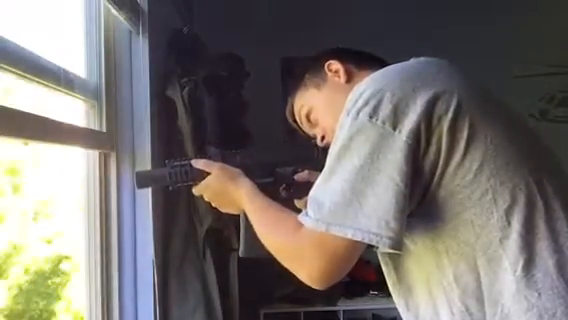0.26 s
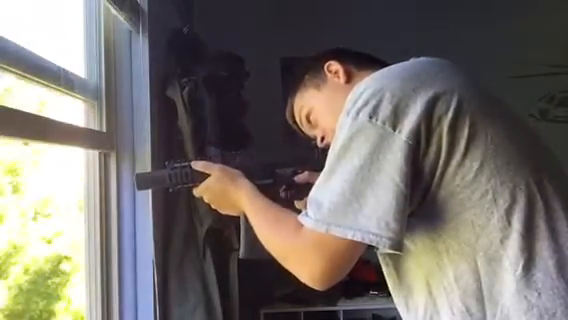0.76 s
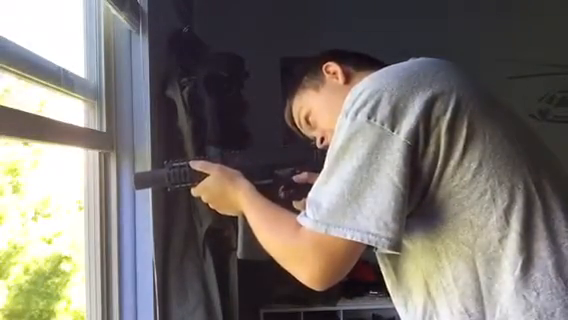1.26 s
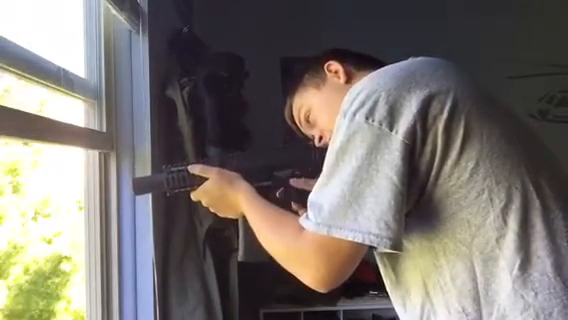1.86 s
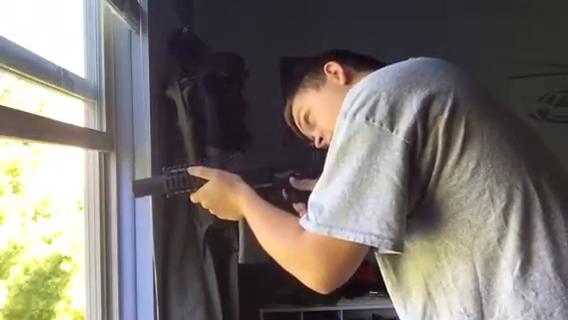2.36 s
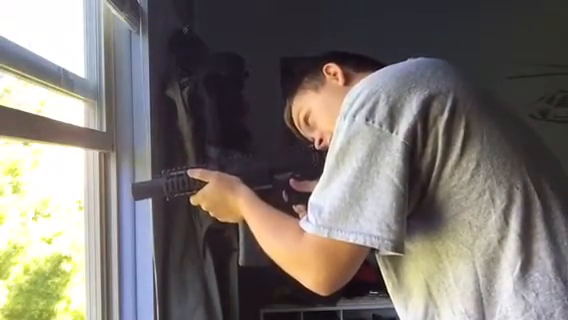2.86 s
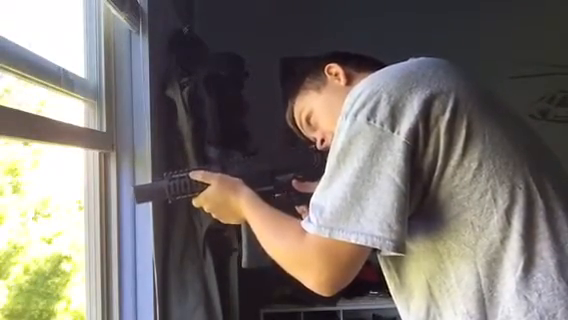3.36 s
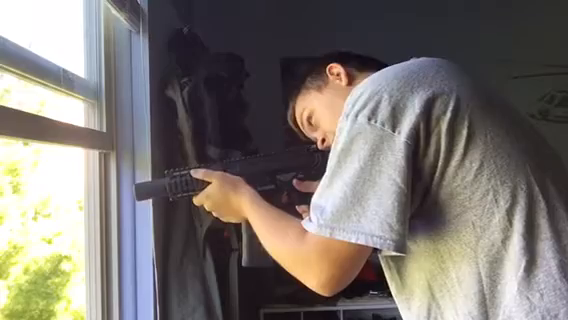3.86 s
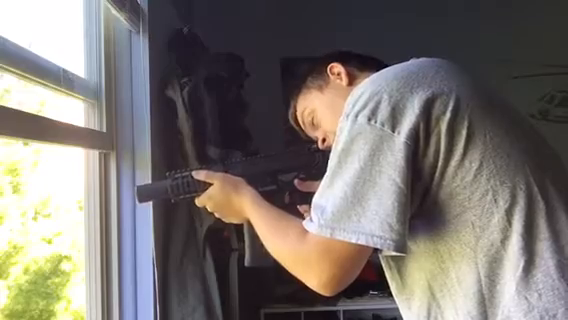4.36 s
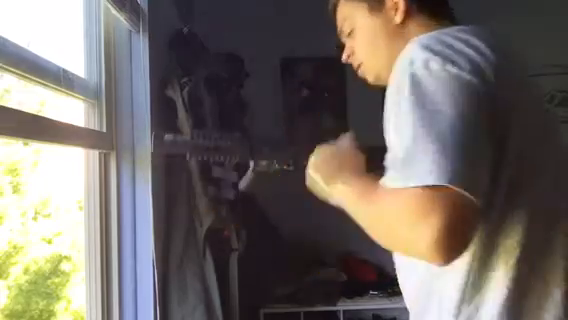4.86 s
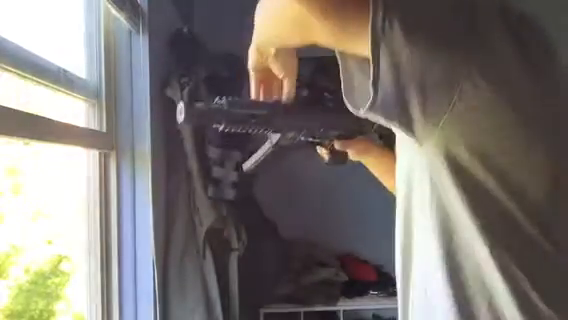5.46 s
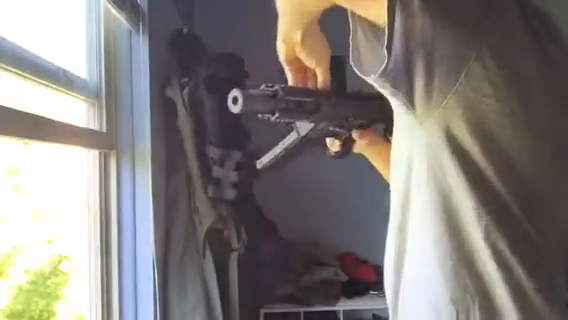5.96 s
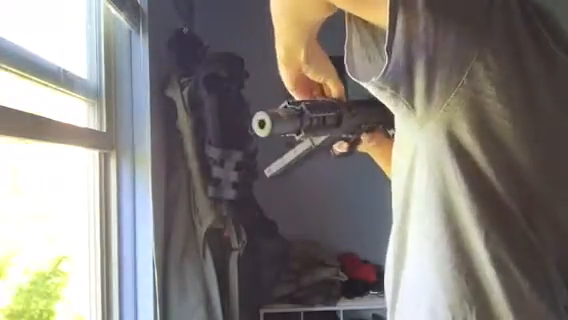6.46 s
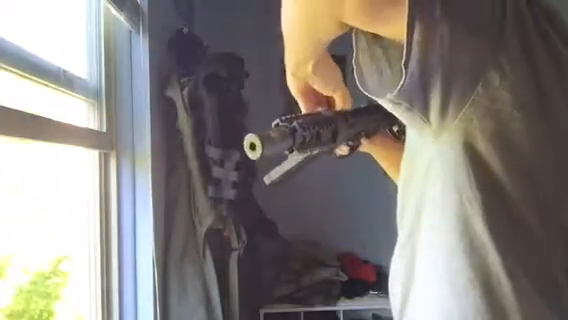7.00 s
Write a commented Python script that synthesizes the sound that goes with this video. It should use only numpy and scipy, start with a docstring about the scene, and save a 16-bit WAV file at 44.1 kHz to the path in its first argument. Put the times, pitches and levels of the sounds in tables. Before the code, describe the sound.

The tail of one shot opens the scene, followed by six dry, punchy semi-automatic airsoft shots, unevenly spaced, each with a tiny motor zip and springy metallic ring. After a pause a switch clicks crisply, and a rapid chattering burst follows, its motor coasting down. Then it is quiet: sparse light ticks of loose rifle parts, faint hum and room noise, heard close with short indoor reverberation.

```python
"""A small room: an electric airsoft rifle fires single shots, its selector snaps over and a burst follows.
For each shot the motor winds up rasping gears and the piston slams home: a cluster of knocks, coloured
as a crack, rings the modes of gearbox and stock. Coloured clicks mark the handling, mostly after the burst.
Beneath lie a wavering low hum and faint hiss, made of a drifting sine and filtered noise."""
import sys
import numpy as np
from scipy import signal
from scipy.fft import rfft, irfft
from scipy.io import wavfile
from scipy.ndimage import uniform_filter1d, minimum_filter1d

SR = 44100
rng = np.random.default_rng(int(sys.argv[2]) if len(sys.argv) > 2 else 0)


def master_out(mix):
    """Clip the mix to full scale and print it as 16-bit PCM to the path in sys.argv[1]."""
    frames = np.transpose(np.atleast_2d(mix))
    ceiling = np.clip(frames, -1, 1)
    pcm = np.round(ceiling * 32767).astype(np.int16)
    wavfile.write(sys.argv[1], SR, pcm)


N = 318962
LEAD = SR // 4  # samples computed ahead of time 0
T = np.arange(-LEAD, N) / SR
SHORT = np.arange(SR // 2) / SR  # time axis of one hit, s

# Single shots. Each row: piston landing in seconds, wind-up before it in seconds, gear level in dB,
# start-up growl in dB, force in dB, thump (ringing relative to force) in dB.
SINGLE_SHOTS = [(-.11, 0.035, -1, -6, -0.5, 13.5), (.124, 0.052, 2, -2.5, 2.5, 5.5),
                (0.7881, 0.059, 3, -2, 2, 6.5), (0.9955, .048, 0, -6.5, 4, 2.5),
                (1.1697, 0.055, -1, -3, 3.5, 5), (1.3265, 0.051, -1, -5, 2.5, 4.5),
                (1.4952, 0.055, -1, -5, 2, 5.5)]
# Knocks within one blow, as the piston lands and rebounds. Each row: delay in seconds, relative level in dB.
PISTON_KNOCKS = [(0, -0.5), (.0015, 3), (.0038, -6), (.0055, 2.5)]
# Modes of the rifle. Each row: frequency in Hz, relative level in dB, T60 in seconds.
RIFLE_MODES = [(141.6, -0.5, 0.05), (185, -4, 0.033), (271.7, 2.5, .085), (395, 0.5, 0.057),
               (619.6, -5.5, 0.18), (817, -9.5, 0.032), (974, -5.5, 0.092), (1200, -7.5, 0.18),
               (1459, -6.5, 0.082), (1650, -6.5, .08), (1862, -8.5, 0.27), (2145, 0.5, 0.072),
               (2862, -7.5, .1), (4480, -1, 0.074), (5600, -6.5, 0.055)]
# Modes of the nozzle plate. Each row: frequency in Hz, relative level in dB, T60 in seconds.
NOZZLE_PLATE_MODES = [(1510, -5.5, 0.18), (1858, 1, .12), (2830, 1, .11), (3250, -2.5, 0.085)]
# Spectrum of the piston's crack. Each row: frequency in Hz, relative level in dB.
CRACK_SPECTRUM = [(40, -25.5), (100, -6), (240, 1.5), (500, -2), (1000, -1), (2200, -1.5), (3400, -6),
                  (4600, -4), (6100, -4), (7500, -16), (10000, -22.5), (16000, -24)]
# Burst cycles in which the piston lands softly: cycle numbers, counted from 0.
SOFT_BURST_CYCLES = (3, 6, 8, 12, 16, 19)
# Spectrum of the gear rasp. Each row: frequency in Hz, relative level in dB.
GEAR_SPECTRUM = [(100, -29), (350, -22), (650, -4.5), (1200, 0.5), (2300, -4.5), (3000, 2.5), (3700, -0.5),
                 (4300, 1.5), (5000, -8.5), (5800, 1), (7200, -7), (10000, -12.5), (16000, -22)]
# Spectrum of the selector. Each row: frequency in Hz, relative level in dB.
SELECTOR_SPECTRUM = [(200, -40.5), (700, -30.5), (1100, -14.5), (2400, -11.5), (2800, -2), (4300, -2),
                     (5900, -1.5), (7400, -1.5), (8000, -7), (10500, -16.5), (16000, -19.5)]
# Handling clicks. Each row: start in seconds, relative level in dB, centre of the colour in Hz,
# fall away from it in dB per octave squared, room tail in dB.
HANDLING_CLICKS = [(.682, -29, 5900, 2.5, 3), (2.287, -34.5, 4960, -1.5, -3), (3.921, -21.5, 4640, 24, 6),
                   (4.647, -34, 6960, 1, 1), (4.72, -32.5, 8050, 2, -4), (4.857, -23.5, 2184, 4.5, 2),
                   (5.313, -22, 2204, 2.5, -4), (5.336, -30, 2490, -1.5, -1), (5.356, -25, 2520, -1, -7),
                   (5.7268, -9, 4280, 3.5, -10), (6.181, -27, 1508, 8.5, -9), (6.619, -35.5, 2526, 0.5, -8),
                   (6.638, -35, 2000, 7, -15), (6.901, -23.5, 2600, 8.5, -13)]
# Spectrum common to the handling clicks. Each row: frequency in Hz, relative level in dB.
CLICK_SPECTRUM = [(300, -27), (900, -14), (1250, -2.5), (2500, -6.5), (2900, 0), (3700, -5), (4300, -1),
                  (5200, -11), (6200, -3), (7200, -18.5), (8400, -10), (10000, -24.5), (16000, -26)]
# Wavering of the hum. Each row: time in seconds, relative level in dB.
HUM_LEVELS = [(1.85, -59.5), (2.122, -54), (2.186, -62), (2.38, -57), (3.6, -65), (3.69, -60.5),
              (4.44, -59), (4.71, -75), (5.0, -63), (5.06, -75.5), (5.2, -60), (6.58, -56.5), (6.68, -64.5),
              (7.07, -60), (7.1, -76), (7.2, -57.5)]
# Spectrum of the room's steady noise. Each row: frequency in Hz, relative level in dB.
HISS_SPECTRUM = [(40, -7), (120, 1.5), (380, -3.5), (650, -8.5), (1000, -7.5), (1600, -10.5), (2500, -18.5),
                 (4200, -21), (6500, -26.5), (8800, -23.5), (10000, -32.5), (16000, -37.5)]
# Reverberation of the room. Each row: frequency in Hz, T60 in seconds.
REVERB_T60 = [(100, .26), (300, .27), (600, .28), (1100, .39), (1650, .48), (2600, .35), (6000, .32),
              (10000, .27), (16000, .22)]
# Wall echoes. Each row: delay in seconds, relative level in dB.
WALL_ECHOES = [(.0077, -15), (.0103, -16), (.0127, -17), (.0181, -9), (.0194, -11), (.0213, -11),
               (.0262, -12)]

SCATTER_GAIN = .55  # chance rattle in each piston blow
RETURN_S, RETURN_DB, RETURN_RING_DB = .0185, -7, -25.5  # nozzle clack: delay; crack and ring re blow force
STANDING_HZ, STANDING_T60_S = 286, .48  # standing wave of the room
BURST_ON_S, BURST_OFF_S = 2.41, 3.226  # trigger held
CYCLES_PER_S = 30.26  # piston cycles at full motor speed
SPIN_UP_S, COAST_S = .0613, .16  # time constant of spin-up; time for friction to stop the motor
PRECOCKED_CYCLES = .404  # spring already drawn by this share of a cycle as the burst starts
BURST_GEAR_DB, BURST_GROWL_DB = 3, -3
BURST_FORCE_DB, FORCE_FADE_DB_PER_S = 0.5, 3.5
BURST_THUMP_DB, THUMP_FADE_DB_PER_S = 7, 5
SOFT_DB = -8.5  # added to the force of a soft landing


def piston(crack_db=-2, ring_db=-21, standing_db=-42, rush_db=-5, rush_s=.0025):
    """Blows share one knock cluster and ring the same modes; air rushes out before, the nozzle may clack after."""
    knocks = sum(amp(db) * delayed(snap(rattle=1.33, fade_s=.002), s) for s, db in PISTON_KNOCKS)
    knocks = in_room(knocks, tail_db=-1, walls_db=-5)
    # neighbouring modes swing in opposite directions
    rifle_ring = sum((-1) ** k * amp(db) * mode(hz, t60_s) for k, (hz, db, t60_s) in enumerate(RIFLE_MODES))
    ring = amp(ring_db) * rifle_ring + amp(standing_db) * mode(STANDING_HZ, STANDING_T60_S)
    ring *= 1 - np.exp(-SHORT / .0029)  # the stock takes a moment to swing
    nozzle_ring = amp(RETURN_RING_DB) * sum(amp(db) * mode(hz, t60_s) for hz, db, t60_s in NOZZLE_PLATE_MODES)
    rush_samples = SR // 50
    cracks, rings = np.zeros((2, len(T)))
    for s, force_db, thump_db in blows():
        loose_parts = in_room(snap(rattle=1.9, fade_s=.0035), tail_db=-1, walls_db=-9)
        rush = snap(rattle=3.1, fade_s=rush_s)[:rush_samples][::-1]  # reversed: swells into the blow
        add(cracks, s - rush_samples / SR, amp(force_db + rush_db) * rush)
        add(cracks, s, amp(force_db) * (knocks + SCATTER_GAIN * loose_parts))
        add(rings, s, amp(force_db + thump_db) * ring)
        if s < BURST_ON_S:  # single shots only: the nozzle springs back
            add(cracks, s + RETURN_S, amp(force_db + RETURN_DB) * snap(rattle=4.4, fade_s=.009))
            add(rings, s + RETURN_S, amp(force_db) * nozzle_ring)
    return amp(crack_db) * colour(cracks, CRACK_SPECTRUM) + rings


def blows():
    """Rows (s, force dB, thump dB): one per single shot, one per piston cycle that the motor completes in the burst."""
    rows = [(s, force_db, thump_db) for s, _, _, _, force_db, thump_db in SINGLE_SHOTS]
    cycles = PRECOCKED_CYCLES + CYCLES_PER_S * np.cumsum(motor_speed(BURST_ON_S, BURST_OFF_S)) / SR
    landings_s = T[np.flatnonzero(np.diff(np.floor(cycles)))]
    for k, s in enumerate(landings_s):
        held_s = s - BURST_ON_S
        force_db = BURST_FORCE_DB - FORCE_FADE_DB_PER_S * held_s + SOFT_DB * (k in SOFT_BURST_CYCLES)
        rows.append((s, force_db, BURST_THUMP_DB - THUMP_FADE_DB_PER_S * held_s))
    return rows


def gearbox(mesh_hz=2850, strain_db=13, strain_s=.15, release_s=.04, whine_db=-2, overtone_db=-9,
            growl_db=-22, gears_db=-26):
    """Starting current makes the motor growl; teeth rasp and whine, strained at spin-up, then coast down."""
    speed, drive, current = np.zeros((3, len(T)))
    for on_s, off_s, gear_db, start_db in pulls():
        since_on, since_off = np.maximum(T - on_s, 0), np.maximum(T - off_s, 0)
        turning = motor_speed(on_s, off_s)
        speed = np.maximum(speed, turning)
        strain = amp(gear_db + strain_db * np.exp(-since_on / strain_s))
        drive += strain * turning ** 1.2 * np.exp(-since_off / release_s)
        surge = np.minimum(since_on / .015, 1) * np.exp(-since_on / .13 - since_off / .024)
        current += amp(start_db) * surge

    load = np.sin(2 * np.pi * CYCLES_PER_S * np.cumsum(speed) / SR)  # the spring drags once a cycle
    tooth_hz = mesh_hz * speed * (1 + .009 * load + .012 * band(0, 120))
    teeth = 2 * np.pi * np.cumsum(tooth_hz) / SR
    roughness = np.exp(.069 * np.cos(teeth) + .13 * band(0, 900))
    rasp = colour(unit(rng.standard_normal(len(T)) * roughness), GEAR_SPECTRUM)

    backlash = 1 + .6 * band(0, 260)
    tones = amp(whine_db) * speed ** 5 * np.sin(teeth) + amp(overtone_db) * np.sin(2 * teeth)
    level = drive * amp(gears_db)
    whine = level * backlash * tones
    noise = level * rasp + amp(growl_db) * current * band(hz=1176, width_hz=300)
    direct = amp(-1) * (noise + whine)
    reverberant = amp(-4) * through(noise + amp(-9.5) * whine, room_tail())
    return direct + reverberant


def pulls():
    """Rows (motor on s, motor off s, gear dB, growl dB); in a single shot the blow cuts the motor off."""
    singles = [(s - wind_s, s, gear_db, growl_db) for s, wind_s, gear_db, growl_db, _, _ in SINGLE_SHOTS]
    return singles + [(BURST_ON_S, BURST_OFF_S, BURST_GEAR_DB, BURST_GROWL_DB)]


def motor_speed(on_s, off_s):
    """Share of full speed: exponential spin-up while powered, then friction brakes evenly."""
    spin_up = 1 - np.exp(-np.clip(T - on_s, 0, off_s - on_s) / SPIN_UP_S)
    return spin_up * np.clip(1 - (T - off_s) / COAST_S, 0, 1)


def selector(slide_db=-27, snap_db=-5, ring_db=-17):
    """The fire selector slides, then snaps into its detent and rings briefly."""
    out = np.zeros(len(T))
    ring = amp(ring_db) * (mode(2812, .016) + .9 * mode(5950, .04) + .63 * mode(3232, .035))
    detent = in_room(snap(rattle=3.83, fade_s=.0038), tail_db=-7.5, walls_db=-3)
    add(out, 1.843, amp(slide_db) * snap(rattle=5.9, fade_s=.012))
    add(out, 1.8547, amp(snap_db) * (detent + ring))
    return colour(out, SELECTOR_SPECTRUM)


def handling(level_db=-13, ring_db=-24):
    """Loose parts click as the rifle is moved, each with its own colour and a brief metal ring."""
    out = np.zeros(len(T))
    ring = amp(ring_db) * (.34 * mode(2880, .09) + .38 * mode(1270, .079) + .29 * mode(4200, .06))
    for s, db, centre_hz, fall_db, room_db in HANDLING_CLICKS:
        spectrum = [(hz, level - fall_db * np.log2(hz / centre_hz) ** 2) for hz, level in CLICK_SPECTRUM]
        click = in_room(snap(rattle=1.1, fade_s=.0039), room_db, walls_db=-9) + ring
        add(out, s, amp(db + level_db) * colour(click, spectrum))
    return out


def background(hiss_db=-66, sizzle_db=-86):
    """A wavering low hum (drifting sine and two noise bands), room noise and a thin band of hiss."""
    turns = np.cumsum(55.6 + 1.7 * band(0, 10)) / SR
    swell = amp(np.interp(T, *np.transpose(HUM_LEVELS)))
    hum = swell * (1.7 * np.sin(2 * np.pi * turns) + .21 * band(58, 40) + .39 * band(87, 25))
    room_noise = amp(hiss_db) * colour(rng.standard_normal(len(T)), HISS_SPECTRUM)
    return hum + room_noise + amp(sizzle_db) * band(7850, 980)


def in_room(hit, tail_db, walls_db):
    """A hit, its echoes off the walls and the diffuse tail that it leaves."""
    echoes = sum(amp(db) * delayed(hit, s) for s, db in WALL_ECHOES)
    return hit + amp(walls_db) * echoes + amp(tail_db) * np.linalg.norm(hit) * room_tail()


def room_tail(build_s=.0047, linger_db=-19):
    """Diffuse reverberation of unit energy: each band has its own decay; a faint part lasts twice as long."""
    hz, t, noise = signal.stft(rng.standard_normal(len(SHORT)), SR, nperseg=256)
    decay = amp(-60 * t / read(REVERB_T60, hz)[:, None])
    lingering = amp(linger_db) * np.sqrt(decay)
    tail = signal.istft(noise * (decay + lingering), SR, nperseg=256)[1][:len(SHORT)]
    tail *= 1 - np.exp(-(SHORT / build_s) ** 2)
    return tail / np.linalg.norm(tail)


def snap(rattle, fade_s):
    """A sharp contact (one impulse) and the dying noise chatter that follows it."""
    chatter = rng.standard_normal(len(SHORT)) * np.exp(-SHORT / fade_s)
    return (SHORT == 0) + rattle * chatter / np.linalg.norm(chatter)


def mode(hz, t60_s):
    """One dying resonance: a sine that loses 60 dB in t60_s."""
    return np.exp(-np.log(1000) * SHORT / t60_s) * np.sin(2 * np.pi * hz * SHORT)


def band(hz, width_hz):
    """Noise of rms 1 in one resonance with steep skirts."""
    f = np.fft.rfftfreq(len(T), 1 / SR)
    resonance = 1 / (1 + (2 * (f - hz) / width_hz) ** 2)
    return unit(irfft(rfft(rng.standard_normal(len(T))) * resonance, len(T)))


def colour(x, spectrum, size=4096):
    """Causal (minimum-phase) filter of unit energy with the given spectrum."""
    log_gain = np.log(amp(read(spectrum, abs(np.fft.fftfreq(size, 1 / SR)))))
    response = np.fft.ifft(np.exp(np.conj(signal.hilbert(log_gain)))).real[:size // 2]
    return through(x, response / np.linalg.norm(response))


def through(x, response):
    """Convolves and keeps the length."""
    return signal.fftconvolve(x, response)[:len(x)]


def read(points, hz):
    """Reads a table along log frequency."""
    f, value = np.transpose(points)
    return np.interp(np.log(hz + 1), np.log(f + 1), value)


def delayed(x, s):
    """Shifts a hit later by s seconds, within its own length."""
    return np.roll(x, round(s * SR))


def add(mix, s, sound):
    """Mixes a sound in at time s."""
    part = mix[max(LEAD + round(s * SR), 0):][:len(sound)]
    part += sound[:len(part)]


def amp(db):
    """Decibels to gain."""
    return 10 ** (np.asarray(db) / 20)


def unit(x):
    """Scales to rms 1."""
    return x / np.sqrt(np.mean(x ** 2) + 1e-20)


def scene():
    """The rifle's parts over the sound of the room, from time 0 on."""
    return (piston() + gearbox() + selector() + handling() + background())[None, LEAD:]


def record(dry, threshold=.71, release_nepers_per_s=600, edge_hz=15900):
    """A very fast limiter holds the peaks down; a low-pass then limits the band."""
    over = np.log(np.maximum(abs(dry[0]) / threshold, 1))
    fall = np.arange(N) / SR * release_nepers_per_s
    held = np.maximum.accumulate(over + fall) - fall  # instant attack, steady release
    gain = uniform_filter1d(minimum_filter1d(np.exp(-held), size=13), size=13)
    low_pass = signal.firwin(511, edge_hz, window=("kaiser", 9), fs=SR)
    return signal.oaconvolve(dry * gain, low_pass[None], "same")


dry = scene()
out = record(dry)
master_out(out)
```